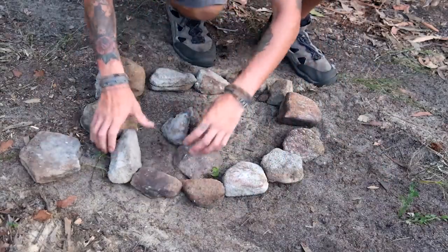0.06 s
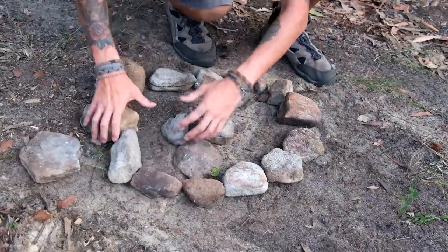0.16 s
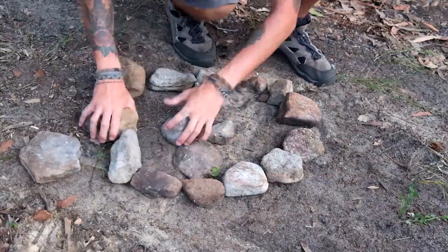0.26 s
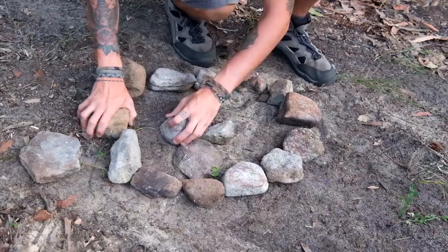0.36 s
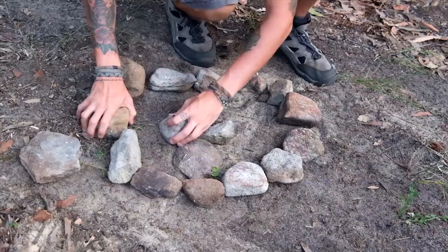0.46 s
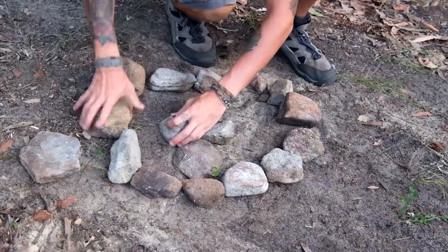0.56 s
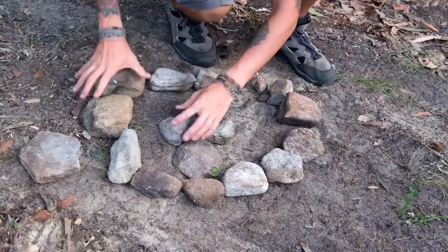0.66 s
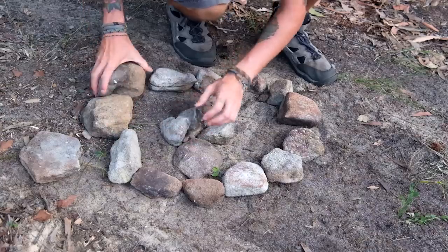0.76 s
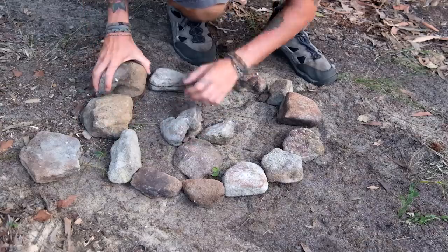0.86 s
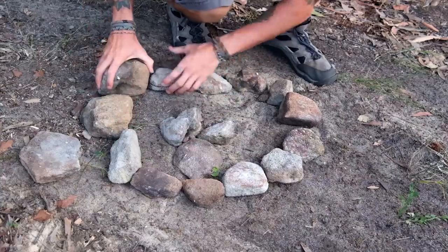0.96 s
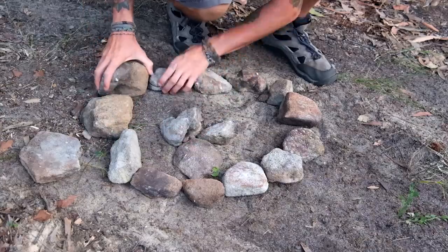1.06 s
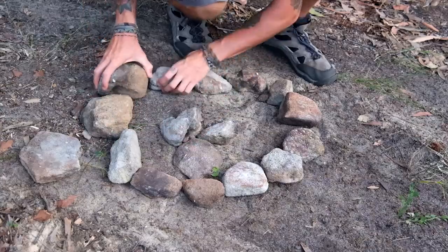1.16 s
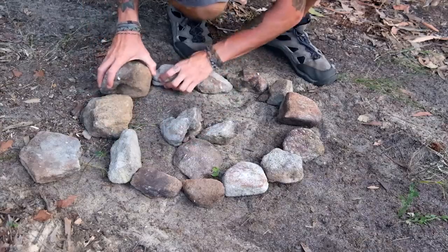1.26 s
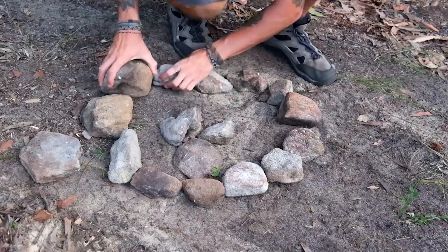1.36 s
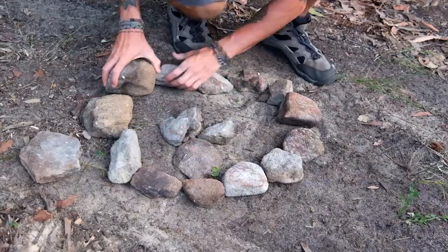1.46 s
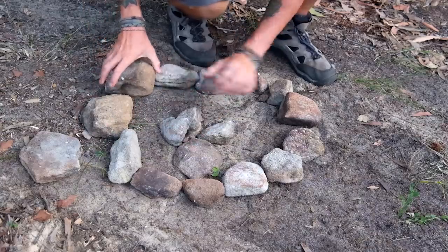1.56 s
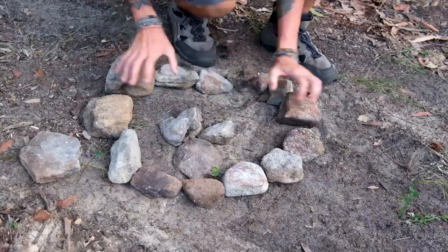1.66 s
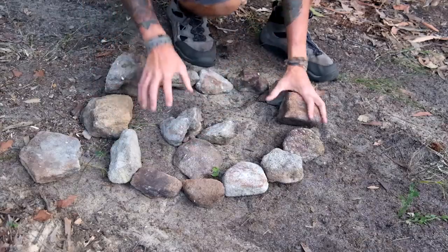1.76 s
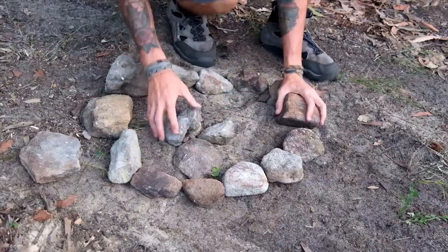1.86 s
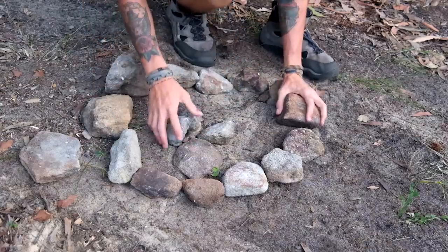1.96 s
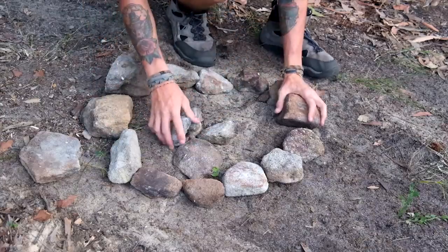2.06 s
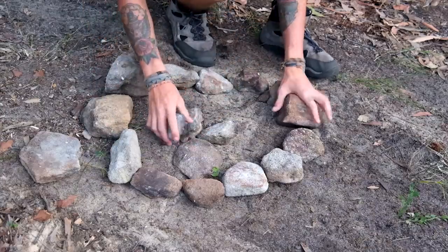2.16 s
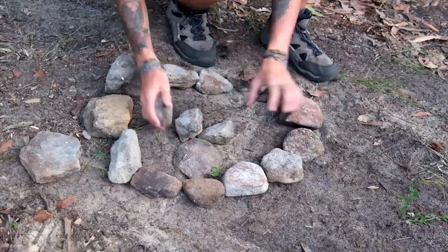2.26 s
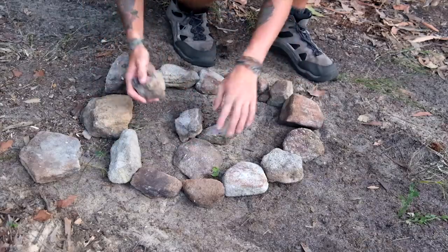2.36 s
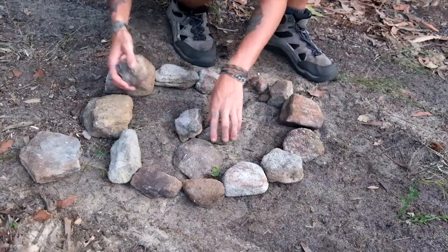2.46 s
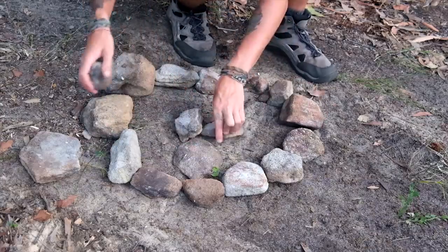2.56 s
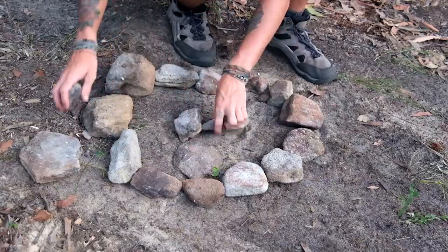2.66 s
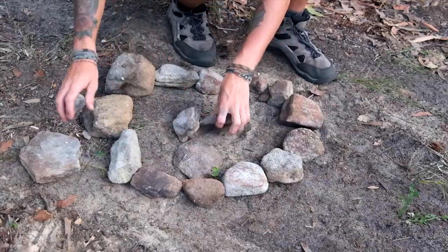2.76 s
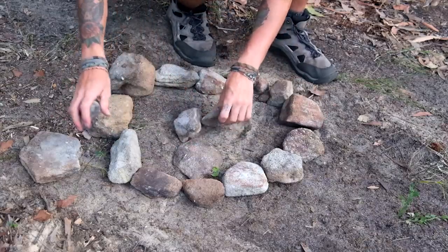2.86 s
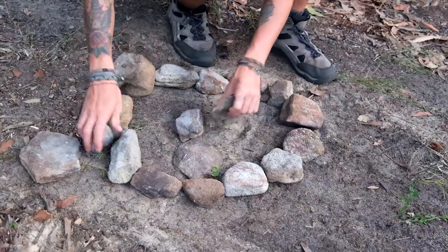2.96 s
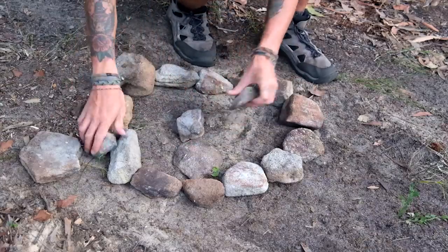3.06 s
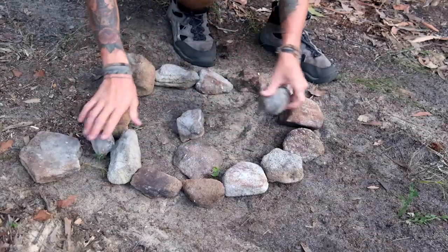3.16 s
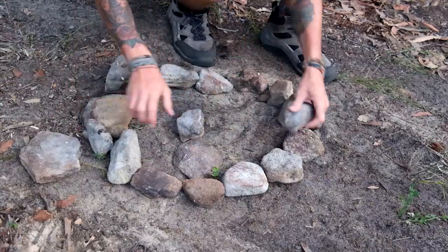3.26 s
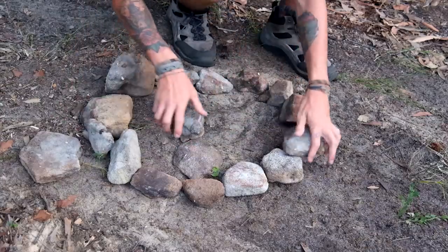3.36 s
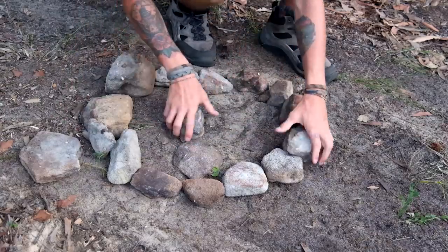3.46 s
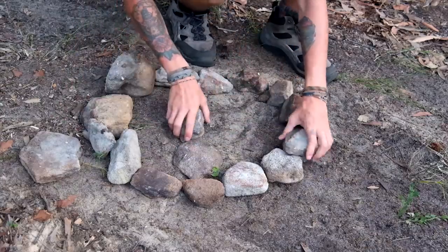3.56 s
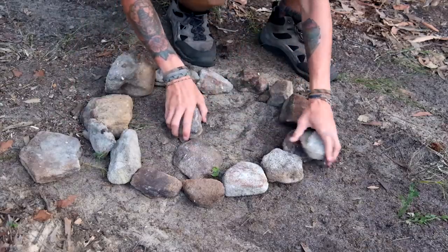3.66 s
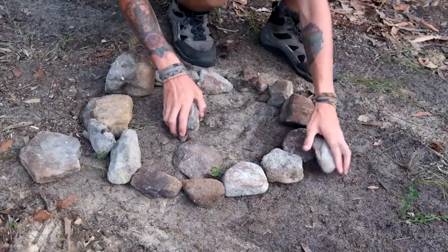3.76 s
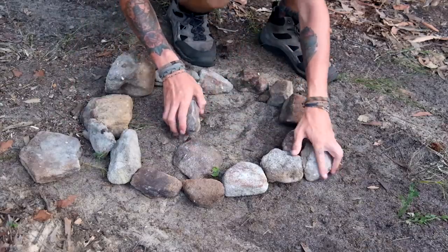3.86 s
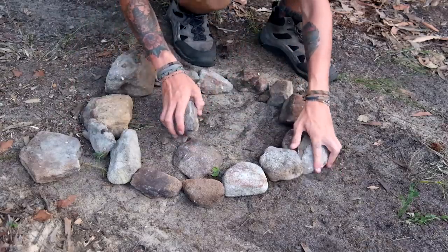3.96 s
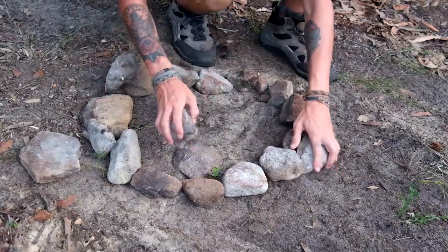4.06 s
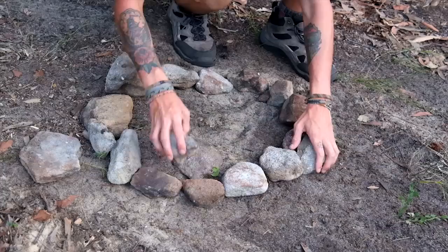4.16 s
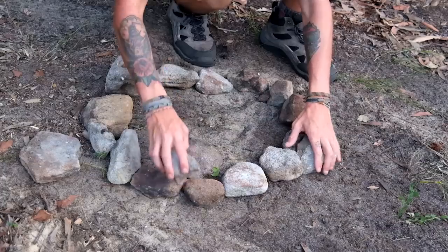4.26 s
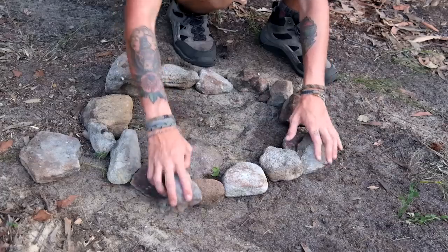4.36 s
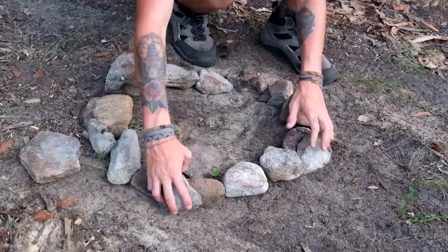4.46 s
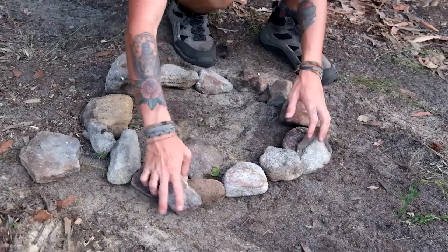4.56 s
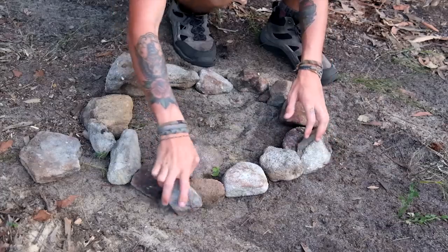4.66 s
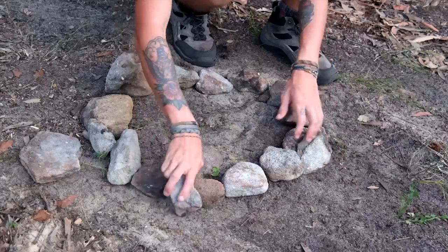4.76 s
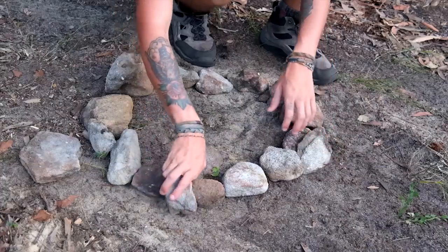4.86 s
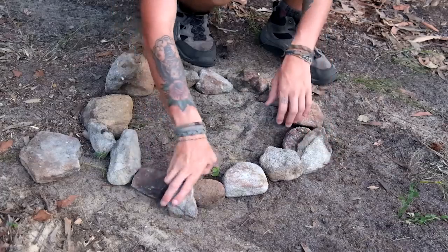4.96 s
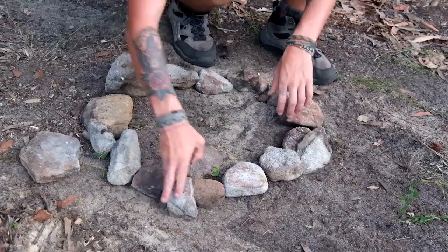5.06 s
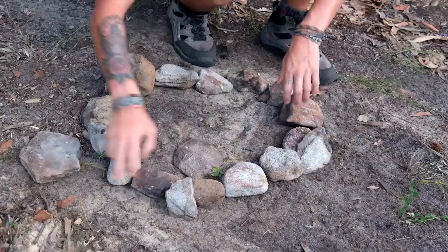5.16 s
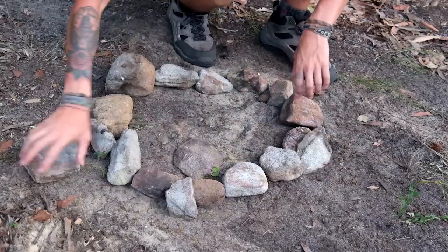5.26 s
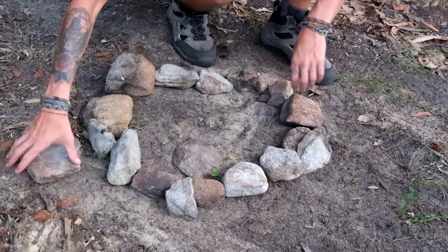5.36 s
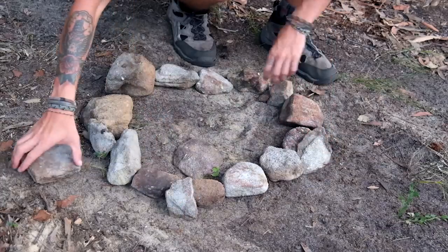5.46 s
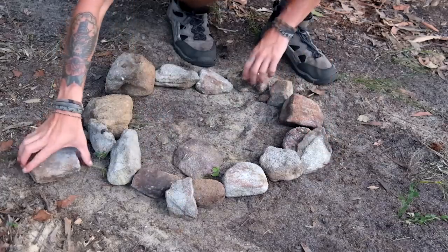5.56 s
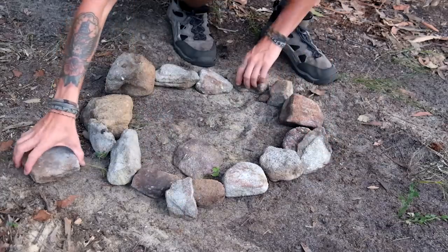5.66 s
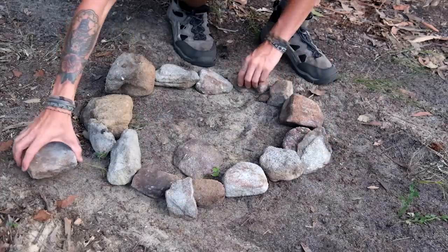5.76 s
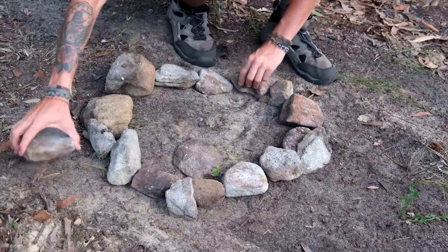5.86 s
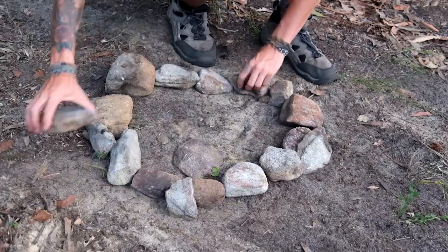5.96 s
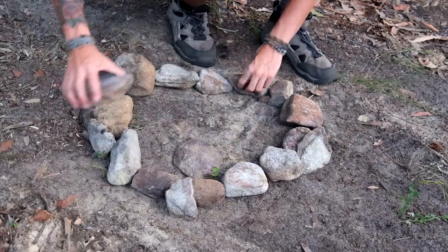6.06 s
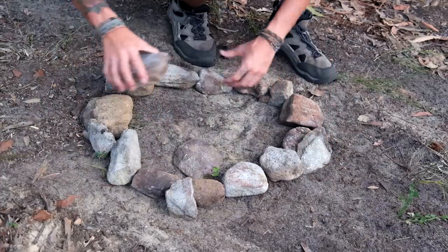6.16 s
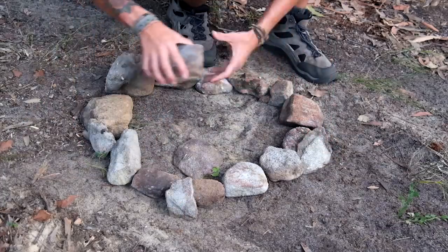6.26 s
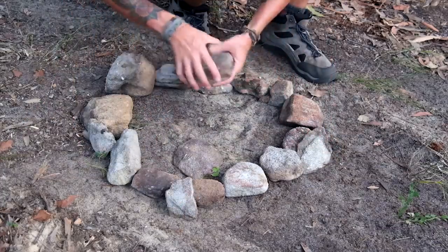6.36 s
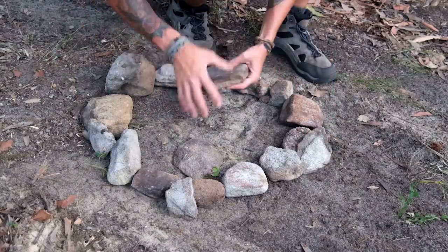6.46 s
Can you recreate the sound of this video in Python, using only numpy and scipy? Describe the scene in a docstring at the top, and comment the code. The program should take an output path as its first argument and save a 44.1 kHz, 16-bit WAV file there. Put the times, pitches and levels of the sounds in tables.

```python
"""Sandy dirt in the bush, close to a camera: hands set stones down in a ring. Each contact is a short pressure
pulse with a low thud, decaying modes of a small and a flat stone, and a burst of noise for crushed grit.
Drags are trains of random slips, coloured by dirt, sand or the modes of the stones. Insects hiss in the trees
over a far rumble and a hiss, all shaped stereo noise; a small bird's faint peeps are rising sine tones."""
import sys
import numpy as np
from scipy import signal
from scipy.fft import rfft, irfft, next_fast_len
from scipy.io import wavfile
from scipy.ndimage import uniform_filter1d, map_coordinates

SR = 44100
rng = np.random.default_rng(int(sys.argv[2]) if len(sys.argv) > 2 else 0)


def unload_audio(sound):
    """Save the sound as a 16-bit wav file, at the path given as the first command line argument."""
    columns = np.transpose(np.atleast_2d(sound))
    # keep every value between -1 and 1, then stretch to whole-number steps
    steps = np.round(np.clip(columns, -1, 1) * 32767)
    wavfile.write(sys.argv[1], SR, steps.astype(np.int16))


N = 286650

# modes of the small stone: (frequency [Hz], relative level [dB], decay by 60 dB [s])
SMALL_STONE_MODES = [(4450, -15, 0.028), (5240, -6.5, 0.026), (5350, -9.5, 0.026), (7210, -9, 0.019),
                     (8960, -10.5, 0.0066), (11200, -28, 0.01), (13500, -25, .008)]


def contacts():
    """Impact: each contact jolts the air, thuds into the dirt, excites modes of the stones and cracks grit."""
    # impacts: (time [s], knock level [dB], knock pitch [Hz], knock length [cycles, held to 0.3-4],
    # small stone level [dB], flat stone level [dB], starting grit level [dB])
    contact_rows = [(0.3079, -23.5, 1540, 1.1, -55, -50, -50), (0.3187, -20, 1630, 0.64, -49, -19, -45),
                    (0.332, -31, 1430, 0.84, -50, -18, -45), (0.347, -19, 1840, 0.62, -32, -37, -47),
                    (0.3386, -27, 1440, 1.1, -35, -43, -45), (0.3655, -28, 1490, 1.1, -66, -51, -51),
                    (0.3834, -20.5, 1740, 0.66, -33, -40, -48), (0.391, -26, 1500, 1.2, -43, -49, -43),
                    (0.403, -21.5, 3420, 0.7, -41, -41, -40), (0.4219, -25, 1440, 0.44, -52, -41, -55),
                    (0.585, -34, 3320, 0.55, -55, -48, -55), (0.795, -35, 2500, 0.41, -62, -37, -52),
                    (1.248, -30.5, 860, 0.42, -55, -52, -34), (1.446, -26, 724, 0.5, -45, -56, -34),
                    (1.8946, -37, 3290, 0.63, -52, -24, -42), (1.9405, -34, 3080, 1.5, -51, -46, -43),
                    (2.0173, -51, 1120, 0.5, -47, -54, -41), (2.1813, -55, 520, 0.55, -46, -27, -40),
                    (2.2867, -45, 1100, 0.55, -41, -61, -44), (2.5829, -53, 1100, 0.55, -65, -67, -38),
                    (2.6911, -31.5, 960, 0.86, -37, -58, -59), (2.716, -44, 900, 0.55, -43, -61, -54),
                    (2.7284, -34, 1080, 0.49, -46, -55, -45), (2.759, -35.5, 970, 0.73, -42, -57, -54),
                    (2.7747, -41, 950, 0.55, -38, -58, -54), (2.788, -50, 1080, 0.55, -37, -60, -53),
                    (2.81, -39, 880, 0.55, -39, -63, -55), (2.8373, -34, 520, 0.27, -32, -47, -37.5),
                    (2.8734, -45, 3320, 0.43, -32.5, -39, -40), (3.003, -12, 1200, 0.51, -55, -11.5, -53),
                    (3.0362, -12, 4960, 0.65, -60, -60, -37), (3.037, -13, 1130, 0.23, -40, -34, -31),
                    (3.045, -23.5, 5460, 3.2, -60, -60, -50), (3.0455, -22, 1100, 0.27, -45, -21, -41),
                    (3.175, -39, 3000, 0.55, -62, -26, -48), (3.386, -6, 1240, 0.45, -36, -49, -38),
                    (3.3973, -8.5, 1940, 0.27, -42, -32, -30), (3.4001, -1.5, 1620, 0.79, -37, -17, -31),
                    (3.4, -16.5, 3560, 0.71, -60, -60, -53), (3.4067, -2, 1090, 0.31, -31, -40, -31),
                    (3.413, -18, 865, 0.28, -48, -57, -60), (3.434, -30, 1200, 0.63, -55, -60, -55),
                    (3.4576, -24.5, 710, 0.29, -53, -61, -51), (3.483, -34, 730, 0.57, -50, -62, -52),
                    (3.4875, -35, 706, 0.58, -37, -50, -52), (3.5551, -7, 1930, 0.52, -42, -22, -41),
                    (3.5572, -17, 2350, 1.8, -65, -60, -60), (3.5626, -20, 1640, 0.55, -51, -51, -53),
                    (3.6865, -28, 2200, 0.66, -36.5, -50, -55),
                    (3.8678, -14, 2750, 0.71, -17.5, -15, -20.5), (3.8757, -13, 1040, 0.42, -29, -15, -26),
                    (3.968, -21.5, 1720, 0.37, -35, -42, -36), (4.0105, -15.5, 1120, 0.26, -22, -51, -39),
                    (4.0203, -26.5, 775, 0.43, -28.5, -26, -45), (4.0386, -47, 520, 0.55, -34, -43, -40),
                    (4.053, -38, 1400, 0.47, -45, -56, -45), (4.1154, -38, 600, 0.58, -43, -57, -54),
                    (4.14, -48, 2500, 0.55, -41.5, -56, -50), (4.442, -0.5, 1460, 0.39, -43, -23, -28),
                    (4.4428, -25, 5230, 1.9, -60, -60, -45), (4.4429, -6.5, 1070, 0.52, -43, -38, -22.5),
                    (4.4515, -40, 580, 0.35, -32, -44, -35), (4.7966, -29.5, 830, 0.4, -52, -56, -53),
                    (4.8286, -36, 1230, 0.36, -39, -46, -45), (4.8425, -30.5, 1570, 0.41, -39.5, -53, -46),
                    (4.856, -34, 1590, 0.41, -51, -52, -44), (4.931, -36, 1070, 0.72, -55, -58, -45),
                    (4.98, -37, 1010, 1.2, -49, -51, -32), (4.9857, -30, 1120, 0.52, -49, -39, -32),
                    (5.0017, -19, 836, 0.45, -48, -39, -35), (5.8392, -30.5, 1830, 1.1, -58, -23.5, -35),
                    (5.868, -34, 2500, 0.36, -62, -36, -48), (5.9528, -29.5, 855, 0.88, -58, -44, -42)]
    # modes of the flat stone: (frequency [Hz], relative level [dB], decay by 60 dB [s])
    flat_stone_modes = [(3486, -15.5, 0.025), (7000, -15.5, 0.0068)]
    # colour of crushed grit: (frequency [Hz], relative level [dB])
    grit_colour = [(1500, 13), (3000, 7), (6000, 5.5), (9000, 7), (11500, 9.5), (14000, -3), (16000, -8)]
    lead, early = 128, 10  # samples: room before the jolt's centre; start of the rings ahead of that centre
    t = np.arange(2048) / SR
    after = t[:-lead]
    small_body = signal.butter(2, 160 / (SR / 2), "high")  # a fist-sized stone radiates no bass
    out = np.zeros((2, N))
    for s, knock_db, hz, cycles, small_db, flat_db, grit_db in contact_rows:
        knock = jolt(t - lead / SR, hz, np.clip(cycles, .3, 4))
        hit = amp(knock_db) * signal.lfilter(*small_body, knock)
        small_ring = amp(small_db) * ring(SMALL_STONE_MODES, after, spread_db=2.5)
        flat_ring = amp(flat_db) * ring(flat_stone_modes, after, spread_db=3.0)
        hit[lead - early:-early] += small_ring + thud(after, knock_db) + flat_ring
        add(out, round(s * SR) - lead, scattered(hit, level_db=-9.5))
        crack = wide(rng.standard_normal((3, len(after))), grit_colour)
        add(out, round(s * SR) - early, amp(grit_db - 60 * after / 0.011) * crack)  # 60 dB down in 11 ms
    return out


def jolt(t, hz, cycles):
    """Acceleration noise: a stone stopped short pushes the air, then pulls it back, rising faster than it ends."""
    width = cycles * np.where(t < 0, .75, 1.15)
    return np.cos(2 * np.pi * hz * t + np.pi / 3) * np.exp(-(t * hz / width) ** 2)


def thud(t, knock_db):
    """Damped resonance: the dirt under a heavy stone gives one low mode that builds up and dies away."""
    hz, below_knock_db, t60, build_up = 80.5, 42, 0.22, 0.0096  # the last two in s
    decay = amp(knock_db - below_knock_db - 60 * t / t60)
    return decay * np.sin(2 * np.pi * hz * t) * (1 - np.exp(-t / build_up))


def ring(modes, t, spread_db):
    """Modal decay: a stone rings as a sum of damped sines, each mode struck at a new random strength."""
    total = 0
    for hz, db, t60 in modes:
        strength_db = db + spread_db * rng.standard_normal()
        total = total + amp(strength_db - 60 * t / t60) * np.sin(2 * np.pi * hz * t)
    return total * (1 - np.exp(-t / 0.0001))  # onset of 0.1 ms


def drags():
    """Stick-slip friction: rough faces slip grain by grain on dirt, on stone, over sand; the small stone rings."""
    # drags: (time of full level [s], hold [s], grind on dirt [dB], rasp on stone before its high-pass [dB],
    # sand [dB], small stone [dB])
    drag_rows = [(0.308, 0.0079, -73, -37.5, -58, -75), (0.338, .027, -67, -33, -53, -75),
                 (.375, 0.0097, -70, -36.5, -58, -75), (.39, .014, -70, -35.5, -52, -75),
                 (0.411, .023, -61, -39.5, -61, -75), (0.571, .02, -70, -52, -68, -75),
                 (1.878, 0.013, -57, -47, -51.5, -75), (1.926, 0.033, -58, -49.5, -52.5, -75),
                 (2.18, .015, -68, -60, -60, -75), (2.285, .006, -62, -64, -54, -71),
                 (2.69, .005, -53, -68, -51, -63), (2.736, .035, -56, -73, -60, -50.5),
                 (3.007, 0.0039, -39, -42, -47, -65), (3.042, 0.0053, -54, -38.5, -56, -61),
                 (3.414, 0.0048, -36.5, -50, -60, -65), (3.437, 0.063, -48, -57, -58, -61),
                 (3.558, 0.0048, -34.5, -58, -58, -70), (3.639, 0.014, -49.5, -71, -68, -70),
                 (3.88, .01, -56, -52, -51, -59), (3.9, .02, -68, -62, -58, -56),
                 (3.942, .035, -49, -46.5, -50.5, -45.5), (3.983, .04, -45, -48.5, -51, -42.5),
                 (4.038, .02, -51.5, -50.5, -62, -45), (4.11, .06, -63, -57.5, -67, -53),
                 (4.449, 0.019, -50, -55, -61, -58), (4.665, .015, -58, -68, -69, -75),
                 (4.688, 0.014, -45.5, -60, -54, -75), (4.74, 0.027, -46, -51, -47, -70),
                 (4.783, 0.014, -47.5, -52, -51, -70), (4.824, 0.029, -54.5, -49.5, -57, -64),
                 (4.954, 0.0084, -43.5, -59, -47, -70), (4.968, .036, -43.5, -50, -47, -68)]
    # colour of loose sand: (frequency [Hz], relative level [dB])
    sand_colour = [(1500, -34), (3000, -24), (6000, 4), (9000, -1.5), (11500, 3.5), (14000, -11),
                   (16000, -15)]
    # modes of two stone faces rasping together: (frequency [Hz], relative level [dB], decay by 60 dB [s])
    face_modes = [(1030, -8, 0.0015), (1500, 1.5, 0.005), (2120, 0.5, 0.0037), (2570, -5.5, 0.0055),
                  (3030, 6, 0.0026), (3450, -3, 0.0053), (4280, -3, 0.0035), (4770, -16, 0.0046),
                  (6240, -27, 0.01)]
    rise, fall, heard_db = 1800, 1000, 30  # dB/s, dB/s; each drag is followed this far down
    judder_db = 1.5 * wobble(120)  # the hand's pressure is uneven
    no_bass = signal.butter(2, 950 / (SR / 2), "high")  # the rasp carries nothing much below 950 Hz
    out = np.zeros((2, N))
    for s, hold, grind_db, rasp_db, sand_db, small_db in drag_rows:
        start = round((s - heard_db / rise) * SR)
        length = round((s + hold + heard_db / fall) * SR) - start
        now = start + np.arange(length)
        push = amp(swell(now / SR, s, hold, rise, fall) + judder_db[now])
        rasp = signal.lfilter(*no_bass, rung(face_modes, length, rate=1500))
        tickle = rung(SMALL_STONE_MODES, length, rate=900)
        mix = amp(grind_db) * grind(length) + amp(rasp_db) * rasp + amp(small_db) * tickle
        add(out, start, scattered(push * mix, level_db=-12))
        grains = np.array([slips(length, 2800, spread_db=3) for _ in range(3)])
        add(out, start, amp(sand_db) * push * wide(grains, sand_colour))
    return out


def grind(length):
    """Roughness noise: slips coloured by the dirt, at rms 1, plus sparser bumps over knobs."""
    # colour of a heavy stone on dirt: (frequency [Hz], relative level [dB])
    dirt_colour = [(150, -17), (300, 1.5), (600, 12), (1290, 4), (2000, 1), (3040, 1.5), (4000, -27),
                   (6000, -60)]
    bump = jolt((np.arange(256) - 128) / SR, hz=960, cycles=0.62)
    rough = unit(filtered(slips(length, 1400, spread_db=7.5), lambda hz: amp(along(dirt_colour, hz))))
    bumps = np.convolve(slips(length, 40, spread_db=3), bump)[:length]
    return rough + amp(2) * bumps  # bumps of typical strength are scaled 2 dB over the slips' rms


def rung(modes, length, rate):
    """Impulse response: every slip sets off the same modal ring; the sum is brought to rms 1."""
    response = ring(modes, np.arange(1024) / SR, spread_db=0.8)
    return unit(np.convolve(slips(length, rate, spread_db=7.0), response)[:length])


def slips(length, rate, spread_db):
    """Shot noise: random slips, rate a second on average, of either sign and of uneven size."""
    happens, sign = rng.random((2, length))
    size = amp(spread_db * rng.standard_normal(length))
    return (happens < rate / SR) * size * np.sign(sign - .5)


def swell(t, start, hold, rise, fall):
    """Exponential envelope: dB under full level, a straight rise up to start, a hold, then a straight fall."""
    return np.minimum(0, np.minimum(rise * (t - start), fall * (start + hold - t)))


def scattered(x, level_db):
    """Scattering: stereo of the direct sound and its answer from ground and stones, unlike at the two ports."""
    # decay of the answer from ground and ring of stones: (frequency [Hz], decay by 60 dB [s])
    scatter_decay = [(200, 0.15), (1000, 0.015), (3000, 0.021), (10000, 0.061)]
    hz, t, z = signal.stft(rng.standard_normal((2, 4096)), SR, nperseg=64)
    decay = amp(-60 * t / along(scatter_decay, hz)[:, None])
    tail = signal.istft(z * decay, SR, nperseg=64)[1]
    tail = tail + 0.4 * tail[::-1].mean(axis=0)  # part of the answer is common to both ports
    delayed = np.pad(x, (30, 0))[None]  # samples
    wet = signal.fftconvolve(delayed, tail / np.linalg.norm(tail[0]), axes=1)
    wet *= amp(level_db)
    wet[:, :len(x)] += x * amp([[.4], [-.4]])  # the direct sound leans left
    return wet


def wide(sources, colour):
    """Partial coherence: grains lie spread out, one part reaching both ports, the others one port each."""
    shared, left, right = filtered(sources, lambda hz: amp(along(colour, hz)))
    return unit(0.72 * shared + np.array([left, right]))


def bird():
    """Frequency modulation: thin rising peeps far off waver in pitch, blurred and broken by the trees."""
    # peeps: (time of full level [s], hold [s], pitch at that time before waver [Hz], level before flutter [dB])
    peep_rows = [(5.562, .07, 4910, -53), (5.668, .03, 4960, -57), (5.968, 0.01, 4000, -53.5)]
    rise_hz_per_s, edge_db_per_s = 2000, 700
    t = np.arange(N) / SR
    waver_hz = 45 * wobble(300)
    flutter_db = 3 * np.array([wobble(70), wobble(70)])  # one for each port
    out = np.zeros((2, N))
    for s, hold, hz, db in peep_rows:
        pitch = hz + rise_hz_per_s * (t - s) + waver_hz
        level_db = db + swell(t, s, hold, edge_db_per_s, edge_db_per_s) + flutter_db
        out += amp(level_db) * np.sin(2 * np.pi * np.cumsum(pitch) / SR)
    return out


def insects():
    """Superposition: many insects merge into treble noise whose level and left-right balance drift."""
    # course of the chorus: (time [s], level before wobble [dB], left minus right [dB])
    chorus_course = [(0.0, -52, 3), (0.25, -51, 5), (0.42, -56.5, .5), (0.98, -56, 1), (1.23, -58, -0.5),
                     (2.08, -55.5, 0.5), (2.55, -56, 3.5), (4.14, -53, 4), (4.83, -54.5, 5),
                     (5.88, -52, 3.5), (6.5, -52.5, 3.5)]
    # spectrum of the chorus: (frequency [Hz], relative density [dB per Hz])
    chorus_spectrum = [(3500, -40), (4440, -15), (4870, -4), (5670, -1.5), (6250, 0.5), (7100, 1),
                       (7700, 3.5), (8500, -0.5), (9170, -4), (9770, -5.5), (10800, -15.5), (13000, -63),
                       (16000, -50)]
    level_db, pan_db = curves(chorus_course)
    level_db = level_db + 0.11 * wobble(3.8)
    return amp(level_db + np.outer([.5, -.5], pan_db)) * rush(chorus_spectrum, patchy_db=0.87)


def rumble():
    """Low-pass noise: the far rumble is strongest in the bass and wavers slightly in level."""
    # spectrum of the rumble: (frequency [Hz], relative density [dB per Hz])
    rumble_spectrum = [(12, -44), (20, -14), (86, -2), (226, -1.5), (266, -2.5), (359, -3.5), (474, -5),
                       (1090, -10.5), (1190, -12), (3080, -16), (5000, -19), (6500, -65), (11000, -120)]
    return amp(-51.5 + 0.1 * wobble(3.11)) * rush(rumble_spectrum, patchy_db=1)


def hiss():
    """Stationary noise: a background hiss of constant mean level with small random patches."""
    # spectrum of the hiss: (frequency [Hz], relative density [dB per Hz])
    hiss_spectrum = [(2000, -32), (4000, 0), (8000, -3), (11000, 3.5), (13000, -4.5), (16000, -13)]
    return amp(-66.5) * rush(hiss_spectrum, patchy_db=2.5)


def rush(spectrum, patchy_db):
    """Diffuse field: stereo noise of set coherence, its centre at rms 1, with patches of random gain."""
    # likeness of the two ports: (frequency [Hz], correlation [-1 to 1])
    likeness = [(60, -0.0071), (180, 0.12), (550, 0.17), (1650, 0.28), (4970, -0.23), (15000, 0.1)]
    # balance of the two ports: (frequency [Hz], left minus right [dB])
    leftward = [(60, 0), (180, -0.5), (550, -0.5), (1650, 0), (4970, 0), (15000, 2)]
    z = signal.stft(rng.standard_normal((2, N)), nperseg=512)[2]
    field = uniform_filter1d(rng.standard_normal(z.shape[1:]), size=6, axis=0)  # across frequency
    field = uniform_filter1d(field, size=12, axis=1)  # across time
    pair = signal.istft(z * amp(patchy_db * unit(field)), nperseg=512)[1][:, :N]

    def mid_side(hz):
        turn = np.arccos(np.clip(along(likeness, hz), -1, 1)) / 2  # half the angle whose cosine is the likeness
        return amp(along(spectrum, hz)) * [np.cos(turn), np.sin(turn)]

    def lean(hz):
        return amp(np.outer([.5, -.5], along(leftward, hz)))

    mid, side = filtered(pair, mid_side)
    pair = filtered(np.array([mid + side, mid - side]), lean)
    return pair / np.std(pair.mean(axis=0))


def amp(db):
    """Level: the gain that a number of dB stands for."""
    return 10 ** (np.asarray(db) / 20)


def unit(x):
    """Normalisation: x at rms 1."""
    return x / np.sqrt(np.mean(x ** 2) + 1e-20)


def along(points, hz):
    """Interpolation: (frequency, value) points joined on a log frequency axis."""
    f, v = np.transpose(points)
    return np.interp(np.log(hz + 1), np.log(f + 1), v)


def curves(rows):
    """Interpolation: one value per sample for each column after the time."""
    s, *cols = np.transpose(rows)
    return [np.interp(np.arange(N) / SR, s, c) for c in cols]


def wobble(rate):
    """Band-limited fluctuation: a smooth random curve, rate knots a second."""
    knots = rng.standard_normal(int(N * rate / SR) + 4)
    return map_coordinates(knots, [np.arange(N) * rate / SR])


def filtered(x, response):
    """Linear filtering: the spectrum of x times a response of frequency."""
    m = next_fast_len(x.shape[-1] + 8192)
    return irfft(rfft(x, m) * response(np.fft.rfftfreq(m, 1 / SR)), m)[..., :x.shape[-1]]


def add(track, start, x):
    """Superposition: lay x into track from sample start, cut at the end."""
    part = track[:, start:start + x.shape[1]]
    part += x[:, :part.shape[1]]


def scene():
    """Superposition: stones in front, bush all round."""
    return contacts() + drags() + bird() + insects() + rumble() + hiss()


def record(dry):
    """Band limiting: the camera keeps nothing from 16.3 kHz up."""
    return filtered(dry, lambda hz: hz < 16300)


dry = scene()
out = record(dry)
unload_audio(out)
```